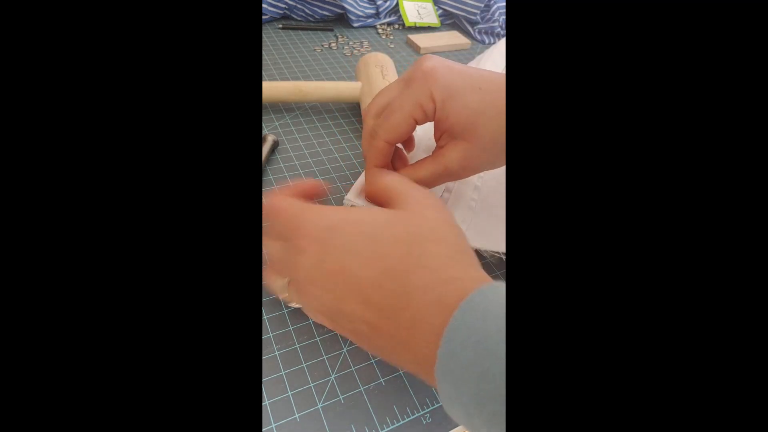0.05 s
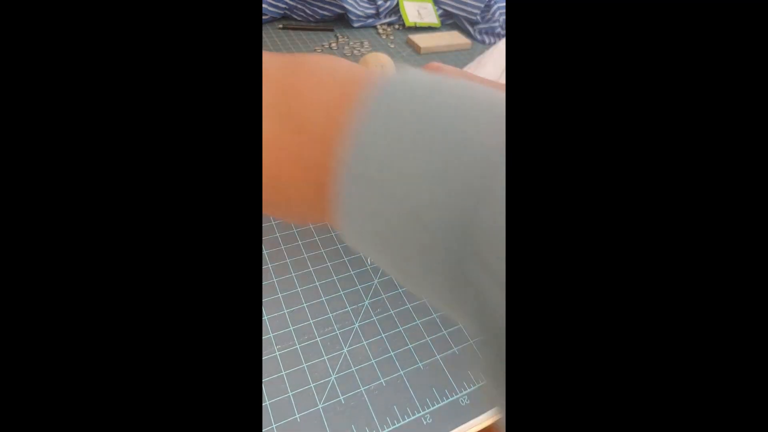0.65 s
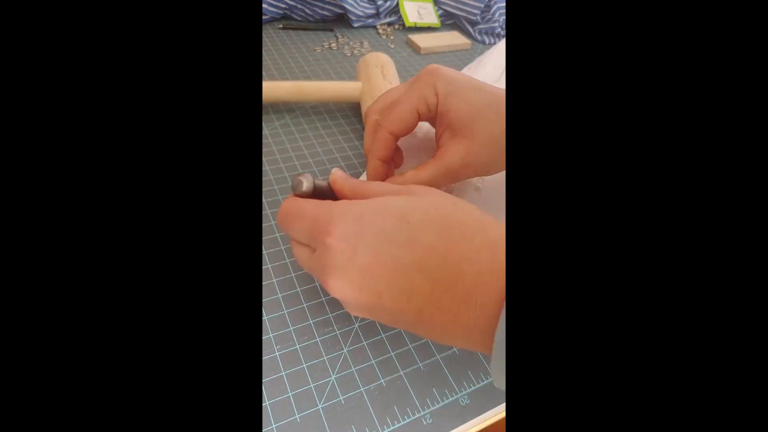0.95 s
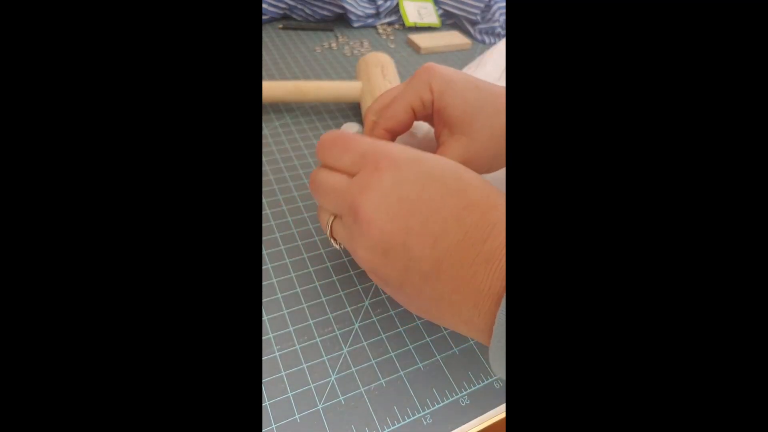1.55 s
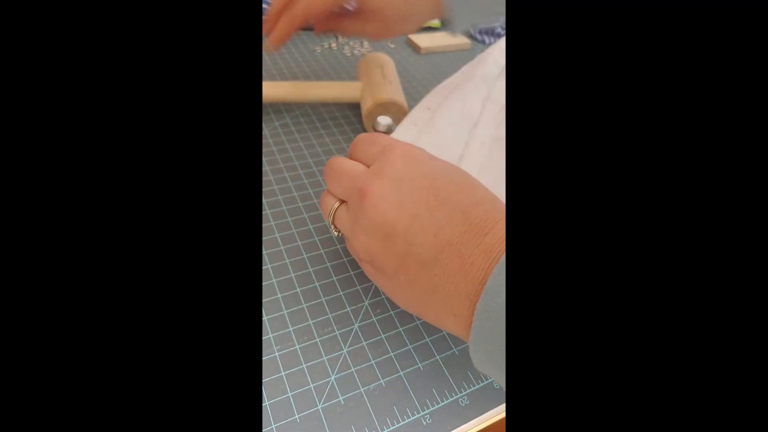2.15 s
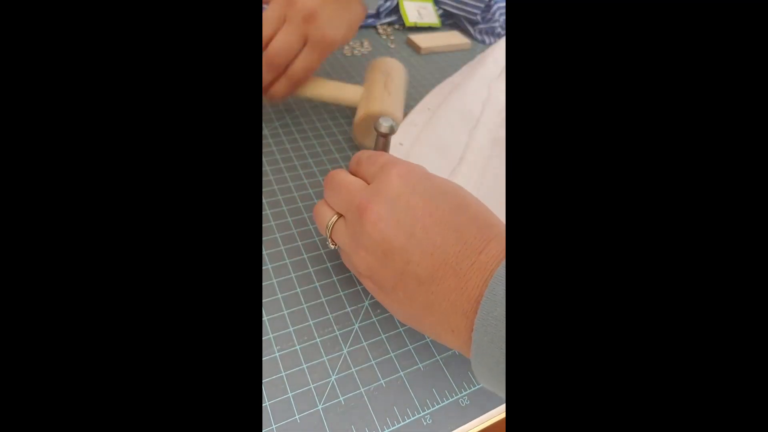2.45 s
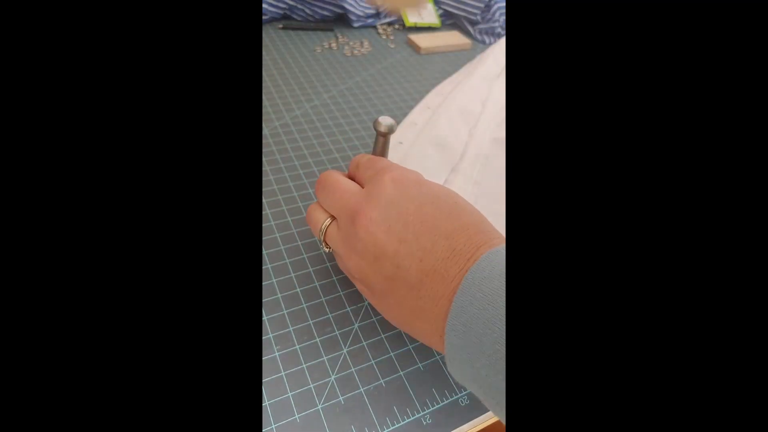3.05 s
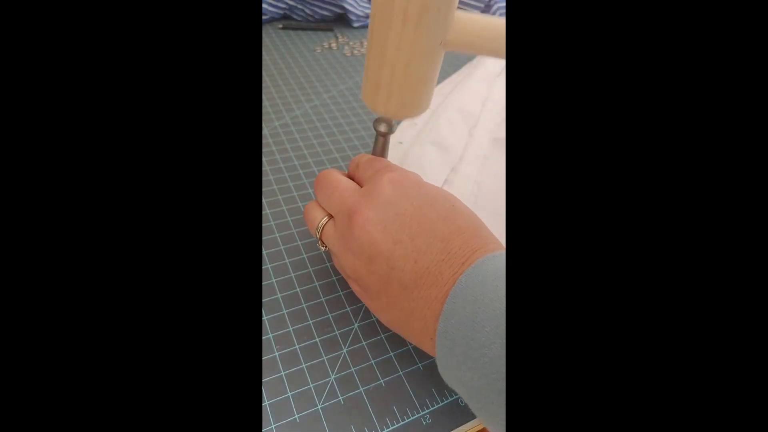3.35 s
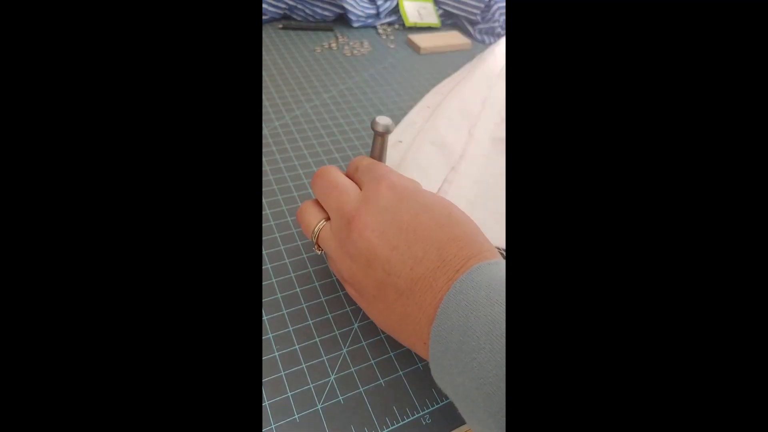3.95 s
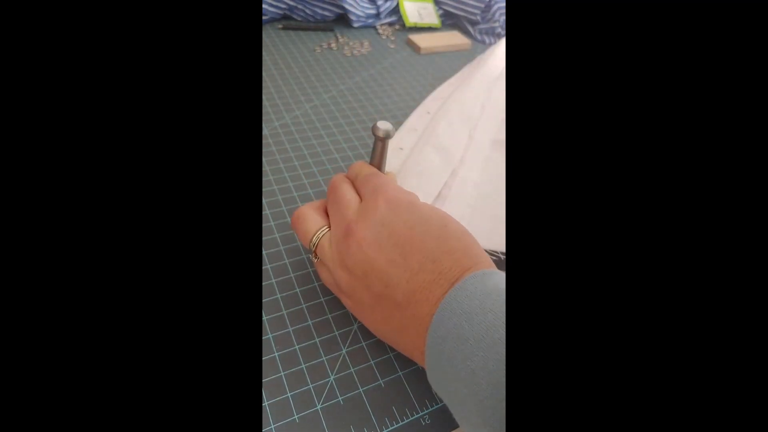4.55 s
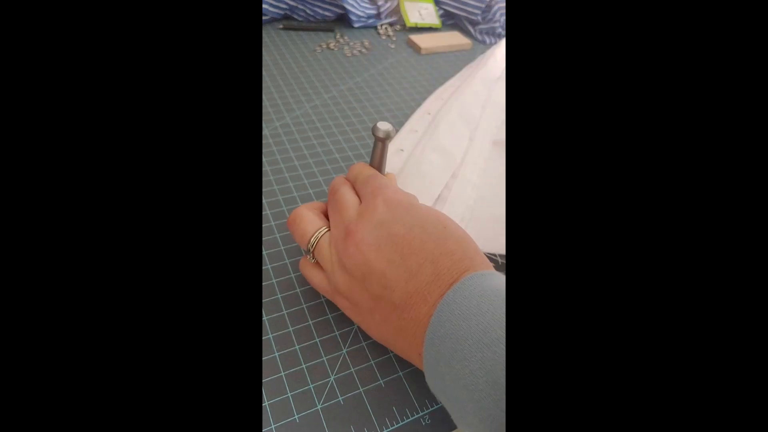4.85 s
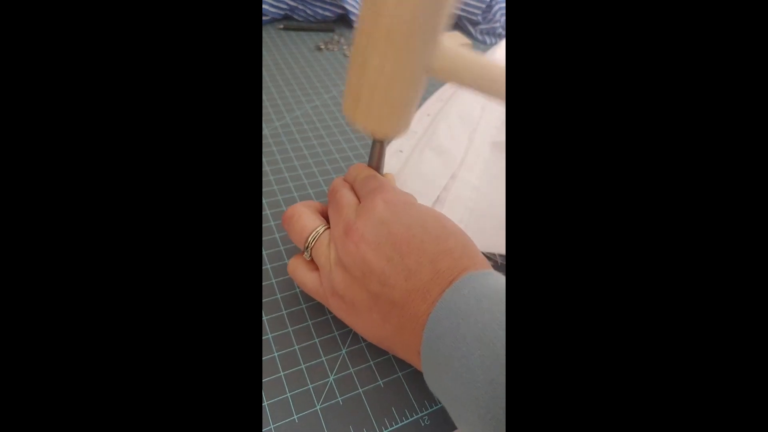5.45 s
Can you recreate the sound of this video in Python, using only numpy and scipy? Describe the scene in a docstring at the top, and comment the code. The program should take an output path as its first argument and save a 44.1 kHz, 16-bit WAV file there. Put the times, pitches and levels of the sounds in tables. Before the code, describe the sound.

A faint low rumble fills a small room, with the microphone close to a work table. A tiny metal click comes at the start, and another with a short scrape at about 0.5 seconds. From 1 to 2.3 seconds hands bump the table softly, and a steel tool is set on a cutting mat with light knocks near 1.4 and 1.8 seconds. Brief scrapes and a click follow around 2.5 seconds, with faint swishes of cloth. At about 3.5 seconds a wooden mallet gives the tool one dull trial tap, followed by soft bumps and a click. From 4.2 to 5.5 seconds come five loud, even blows, about a third of a second apart. Each combines a sharp crack of wood on steel, a brief metallic ring and a resonant table thud, with a short room echo and slight overload on the peaks.

```python
"""Setting a grommet with a mallet

A steel grommet setter is picked up and placed on a cutting mat, with clicks, swishes, scrapes and bumps.
A wooden mallet gives it one trial tap, then five full blows that seat the grommet.
Every contact is a short push that rings the work table and a small room; hard blows add the crack
of wood on steel. A low rumble lies underneath, and the loudest peaks overload the microphone."""
import sys
import numpy as np
from scipy import signal
from scipy.fft import rfft, irfft
from scipy.io import wavfile

SR = 44100
rng = np.random.default_rng(int(sys.argv[2]) if len(sys.argv) > 2 else 0)


def store_wav(level_fs):
    """Save 16-bit WAV to argv[1]."""
    pcm = np.round(np.clip(np.atleast_2d(level_fs), -1, 1) * 32767)
    wavfile.write(sys.argv[1], SR, pcm.T.astype(np.int16))


N = 252252
RING_N = 32768  # samples allowed for a ring or echo to die away
TICK_T60_S = 0.035  # a t60 is the time a sound takes to fade by 60 dB


def undb(db):
    """Turn decibels into a gain to multiply by."""
    return 10 ** (np.asarray(db) / 20)


def response(points, size):
    """Draw a smooth tone colour through (f/Hz, level/dB) points: one gain for each frequency."""
    hz, db = np.transpose(points)
    return undb(np.interp(np.log(np.fft.rfftfreq(size, 1 / SR) + 1), np.log(hz), db))


def noise(points, size, like_hz, most_alike=0.55):
    """Stereo noise of a given colour; left and right are more alike below like_hz."""
    mid, side = rfft(rng.standard_normal((2, size)))
    alike = most_alike / (1 + (np.fft.rfftfreq(size, 1 / SR) / like_hz) ** 2)
    pair = mid * np.sqrt(1 + alike) + np.array([[1], [-1]]) * side * np.sqrt(1 - alike)
    return irfft(pair * response(points, size) / np.sqrt(2), size)


def pulse(points, size=512):
    """The shortest pulse of a given colour, with its energy packed at the start."""
    cepstrum = irfft(np.log(response(points, size)))
    cepstrum[1:size // 2] *= 2
    cepstrum[size // 2 + 1:] = 0
    return irfft(np.exp(rfft(cepstrum)))


def ring(modes):
    """The fading tones of a struck object; neighbours swing opposite ways, so their sum builds up late."""
    t = np.arange(RING_N) / SR
    return sum((-1) ** k * undb(db - 60 * t / t60) * np.sin(2 * np.pi * hz * t)
               for k, (hz, db, t60) in enumerate(modes))


def through(x, answer):
    """Let every sample of x set off a copy of a mono or stereo answer (convolution)."""
    return signal.fftconvolve(np.atleast_2d(x), np.atleast_2d(answer), axes=1)[:, :N]


def delay(x, ms):
    """The same sound a little later."""
    samples = np.arange(len(x))
    return np.interp(samples - ms * SR / 1000, samples, x, left=0)


def high_pass(x, hz):
    """Take the bass out of a sound."""
    return signal.sosfilt(signal.butter(2, hz, "high", fs=SR, output="sos"), x)


def add(track, s, x):
    """Mix a short sound into a track at s seconds."""
    start = max(int(s * SR), 0)
    track[start:start + len(x)] += x[:N - start]


def push(contact_ms, size=512):
    """The force of one contact: a softer contact lasts longer and holds less treble."""
    u = np.arange(size) / SR * 1000 / contact_ms
    force = u ** 3 * np.exp(-2 * u ** 2)
    return force / force.sum()


def crunch(t60, size=1024):
    """A brief, fading burst of tiny contacts, new every time."""
    x = rng.standard_normal(size) * np.exp(-np.log(1000) * np.arange(size) / SR / t60)
    return x / np.sqrt(np.sum(x ** 2))


# tone colour of the rumble: f/Hz, relative level/dB
RUMBLE_COLOUR = [(15, -34), (25, -23), (38, -13), (50, -3), (76, 0), (123, -11), (166, -11), (215, -22),
                 (350, -30), (575, -36), (800, -37), (1600, -44), (2500, -49), (6500, -58), (16000, -68)]
def rumble(level_db=-56, waver_db=4.5):
    """Low indoor rumble that wavers, with a trace of hiss."""
    air = noise(RUMBLE_COLOUR, N, like_hz=530, most_alike=0.97)
    waver = np.interp(np.arange(N), np.linspace(0, N, 40), rng.standard_normal(40))
    return air / air.std() * undb(level_db + waver_db * waver)


# sharp clicks: t/s, push level/dB, tick level/dB
METAL_CLICKS = [(0.068, -37.5, -35), (0.4646, -27.5, -32), (2.073, -38.5, -44), (2.542, -34, -36),
                (3.8619, -33.5, -32.5)]
def clicks(contact_ms=0.69, body_db=-6.5):
    """Small metal parts touch: a bright tick that hardly moves the table."""
    return [(s, undb(db) * push(contact_ms), undb(tick_db) * crunch(TICK_T60_S), body_db)
            for s, db, tick_db in METAL_CLICKS]


# tone colour of sliding fabric: f/Hz, relative level/dB
CLOTH_COLOUR = [(100, -40), (900, 9), (2000, 16.5), (3200, 24.5), (4500, 18), (6500, 25), (8500, 13.5),
                (11500, 18.5), (13500, -15), (16000, -26)]
# cloth swishes, from the sleeve and, near 2.54 s, the mallet sliding over cloth: middle t/s, half length/s,
# level/dB
CLOTH_SWISHES = [(0.384, 0.11, -75), (2.543, 0.14, -72), (2.815, 0.023, -64.5), (2.896, 0.012, -56.5),
                 (3.051, 0.098, -77)]
def cloth():
    """Sleeve and cloth slide: a soft hiss that swells and fades."""
    t = np.arange(N) / SR
    hiss = noise(CLOTH_COLOUR, N, like_hz=2000)
    swells = sum(undb(db) * np.exp(-.5 * ((t - s) / half) ** 2) for s, half, db in CLOTH_SWISHES)
    return hiss / hiss.std() * swells


def stick_slip(length_s, per_second=1500, spread_db=4):
    """A sliding surface catches and lets go at random moments, in jerks of uneven size."""
    size = int(length_s * SR)
    catches = rng.random(RING_N)[:size] < per_second / SR
    jerks = rng.standard_normal(RING_N)[:size]
    x = catches * np.sign(jerks) * undb(spread_db * abs(jerks)) * signal.windows.tukey(size, .3)
    return x / np.sqrt(np.sum(x ** 2) + 1e-12)


# tools dragged over the mat: t/s, length/s, push level/dB, grit level/dB, change from start to stop/dB
TOOL_DRAGS = [(0.47, 0.108, -20.5, -35, 8), (1.678, 0.12, -16, -45, 5), (2.385, 0.051, -24, -27.5, -4),
              (2.449, 0.086, -26, -39.5, 5)]
def scrapes(contact_ms=0.5, body_db=-7, bass_cut_hz=190):
    """A dragged tool sticks and slips, pressed steadily harder or lighter; sliding stirs little bass."""
    events = []
    for s, length, db, grit_db, swell_db in TOOL_DRAGS:
        slips = stick_slip(length)
        slips *= undb(swell_db * np.linspace(-.5, .5, len(slips)))
        thump = undb(db) * high_pass(np.convolve(slips, push(contact_ms)), bass_cut_hz)
        events.append((s, thump, undb(grit_db) * slips, body_db))
    return events


# hands meeting the table: t/s, push level/dB
HAND_BUMPS = [(1.062, -35), (1.165, -35.5), (1.536, -30), (1.943, -30.5), (2.226, -33.5), (3.628, -27.5),
              (3.692, -31)]
def bumps(contact_ms=1.095, tick_db=-26.5, body_db=1):
    """Hands nudge the table: a long soft push, heard mostly through table and room."""
    events = []
    for s, db in HAND_BUMPS:
        touch = undb(db) * crunch(t60=0.02)  # flesh settles gradually
        events.append((s, np.convolve(touch, push(contact_ms)), undb(tick_db) * touch, body_db))
    return events


# knocks of setter and mallet, the lighter tool giving less bass; the last is the trial tap:
# t/s, push level/dB, tick level/dB, bass cut f/Hz, number of contacts, gap/ms, change per contact/dB
TOOL_KNOCKS = [(1.396, -14.5, -40, 300, 1, -12, 0), (1.8078, -12, -50, 230, 3, 10.5, 3.2),
               (3.456, 0.5, -32, 40, 2, 12.5, -5)]
def knocks(contact_ms=0.69, ms_per_db=0.007, rebound_stretch=1.24, body_db=-11):
    """A tool lands firmly and may bounce or rock at even gaps; those later contacts are duller."""
    events = []
    for s, first_db, tick_db, bass_cut_hz, count, gap_ms, step_db in TOOL_KNOCKS:
        for k in range(count):
            db = first_db + k * step_db
            ms = contact_ms + ms_per_db * db  # a heavier knock sinks deeper into the mat
            ms *= rebound_stretch if k else 1
            thump = undb(db) * high_pass(push(ms, size=2048), bass_cut_hz)
            tick = undb(tick_db + k * step_db) * crunch(TICK_T60_S)
            events.append((s + k * gap_ms / 1000, thump, tick, body_db))
    return events


# full blows: t/s, push level/dB, grommet crunch level/dB, steel ring level/dB
MALLET_BLOWS = [(4.1589, 2, 5, 5), (4.4854, 2.5, 1, -11.5), (4.8097, 2.5, -6.5, 1), (5.132, 2.5, -7.5, -1),
                (5.465, 0.5, 0.5, 2.5)]
def mallet_blows(slack_left=0.41, crack_lead_ms=0.17):
    """The mallet drives the loose grommet home; each blow leaves only a share of its slack."""
    force, force_room, force_table, crack, crack_room, steel = np.zeros((6, N))
    for k, (s, db, crunch_db, steel_db) in enumerate(MALLET_BLOWS):
        # more slack means a longer contact, more crack, and less passed on to table and room
        slack = slack_left ** k
        contact_ms = 0.46 + 0.17 * slack
        crack_db = -10 + 11 * slack
        room_db = -1.5 - 6.5 * slack
        blow = undb(db) * delay(push(contact_ms), crack_lead_ms)  # the table gives way after the crack
        add(force, s, blow)
        add(force_table, s, blow * undb(room_db / 2))
        add(force_room, s, blow * undb(room_db))
        add(crack, s, undb([crack_db]))
        add(crack, s, undb(crunch_db) * crunch(t60=0.0069))  # the grommet's rim curls over
        add(crack_room, s, undb([crack_db / 2 + room_db]))
        add(steel, s, undb([steel_db]))
    return force, force_room, force_table, crack, crack_room, steel


# tones of the setter and mallet head, damped by the hands: f/Hz, level/dB, t60/s
STEEL_TONES = [(1059, -9.5, 0.029), (1530, -16.5, .014), (2220, -28.5, 0.025), (3020, -30, 0.091),
               (3040, -45, 0.42), (3187, -47, 0.4), (3800, -14, 0.0038), (4650, -18, 0.014),
               (6550, -44.5, 0.24), (11860, -39.5, .03)]
def steel_ring(hits):
    """The struck setter and mallet head ring briefly."""
    return undb(0.5) * through(hits, ring(STEEL_TONES))[0]


# tone colour of cracks, ticks and grit: f/Hz, relative level/dB
CRACK_COLOUR = [(100, -13), (700, -30), (1500, 5.5), (2500, 6), (4000, 1.5), (5200, -4.5), (7500, -14),
                (9500, -13.5), (11800, -12), (13200, -27.5), (16000, -39)]
def snap(hits):
    """Hard surfaces meet: each hit becomes a short, bright snap."""
    return through(hits, pulse(CRACK_COLOUR))[0]


# tone colour of the patch of table under the tool: f/Hz, relative level/dB
PATCH_COLOUR = [(25, -22), (70, -6), (150, -2), (300, -2), (450, -5), (700, -2), (950, -7.5), (1300, 0),
                (2200, -2), (6000, -15.5)]
# the thump coming back from nearby surfaces: delay/ms, level/dB
NEAR_ECHOES = [(6.0, -13.5), (13.5, -16.5)]
def table_thump(force, gain_db=29.5, rebound=0.34, rebound_ms=0.59, right_db=-2):
    """The patch of table under the tool gives way and springs back; nearby surfaces return the thump."""
    dent = undb(gain_db) * through(force, pulse(PATCH_COLOUR, size=2048))[0]
    thump = rebound * delay(dent, rebound_ms) - dent
    echoes = sum(undb(db) * delay(thump, ms) for ms, db in NEAR_ECHOES)
    return (thump + echoes) * undb([[0], [right_db]])


def thud_sag(start_hz=370, fall_s=.115, db=-17.5, t60=0.39, build_s=0.025):
    """A low tone that glides down and fades, so the thud sags in pitch."""
    t = np.arange(RING_N) / SR
    phase = 2 * np.pi * np.cumsum(start_hz * np.exp(-t / fall_s)) / SR
    rise = 1 - np.exp(-t / build_s)
    fade = np.exp(-np.log(1000) * t / t60 - (t / fall_s) ** 4)
    return undb(db) * rise * fade * np.sin(phase)


# the work table's own tones: f/Hz, level/dB
TABLE_TONES = [(50, -33.5), (75, -20.5), (122, -28.5), (153, -22), (178, -39), (196, -21.5), (227, -20.5),
               (264, -18), (291, -26), (315, -22.5), (350, -32.5), (388, -27), (420, -30), (475, -28),
               (497, -32), (596, -42), (624, -41), (664, -37), (731, -40), (803, -26), (840, -34),
               (885, -33.5), (950, -43), (1004, -30.5), (1150, -35), (1210, -38.5), (1366, -34.5)]
def table_ring(force, t60_at_300_hz=0.26, damping_slope=0.11, uneven_db=3):
    """The table rings under the thud; low tones last longest, and each is a bit louder on one side."""
    leans_db = uneven_db * rng.standard_normal(len(TABLE_TONES))
    tones = np.array([ring([(hz, db + side * lean, t60_at_300_hz * (hz / 300) ** -damping_slope)
                            for (hz, db), lean in zip(TABLE_TONES, leans_db)])
                      for side in (.5, -.5)])
    return through(force, undb(-2) * tones + thud_sag()) * undb([[.7], [-.7]])


# tone colour of the room's echoes: f/Hz, relative level/dB
ROOM_COLOUR = [(40, -26), (150, -11), (300, 6), (550, 1), (900, 2.5), (1500, -1), (2400, -4.5),
               (4000, -6.5), (7000, -3), (12000, -0.5), (16000, 3)]
def room(t60=0.32, build_s=0.0026):
    """A small room: echoes thicken over the first moments and then die away."""
    t = np.arange(RING_N) / SR
    echoes = noise(ROOM_COLOUR, RING_N, like_hz=910)
    return echoes * (1 - np.exp(-t / build_s)) * np.exp(-np.log(1000) * t / t60)


def scene():
    """All contacts sound directly, through the table and through the room, over cloth and rumble."""
    walls = room()
    force, force_room, force_table, crack, crack_room, steel = mallet_blows()
    # body_db sets how strongly a lighter contact stirs the table and the room
    for s, thump, tick, body_db in knocks() + clicks() + bumps() + scrapes():
        add(force, s, thump)
        add(force_table, s, thump * undb(body_db + 3))
        add(force_room, s, thump * undb(body_db - 2.5))
        add(crack, s, tick)
        add(crack_room, s, tick * undb(body_db - 6))
    bright = undb(11.5) * snap(crack) + steel_ring(steel)
    # the right microphone faces away from the tool: treble gets there later and weaker
    direct = table_thump(force) + np.array([bright, undb(-6) * delay(bright, ms=.5)])
    into_room = undb(-4.5) * force_room + undb(-14.5) * snap(crack_room)
    echoes = through(into_room, walls) * undb([[.5], [-.5]])
    return direct + table_ring(force_table) + echoes + cloth() + rumble()


def record(dry):
    """The microphone overloads softly on the hardest peaks; treble above 15800 Hz is cut."""
    clipped = dry / (1 + dry ** 4) ** (1 / 4)
    return signal.sosfilt(signal.ellip(8, .2, 70, 15800, fs=SR, output="sos"), clipped)


dry = scene()
out = record(dry)
store_wav(out)
```